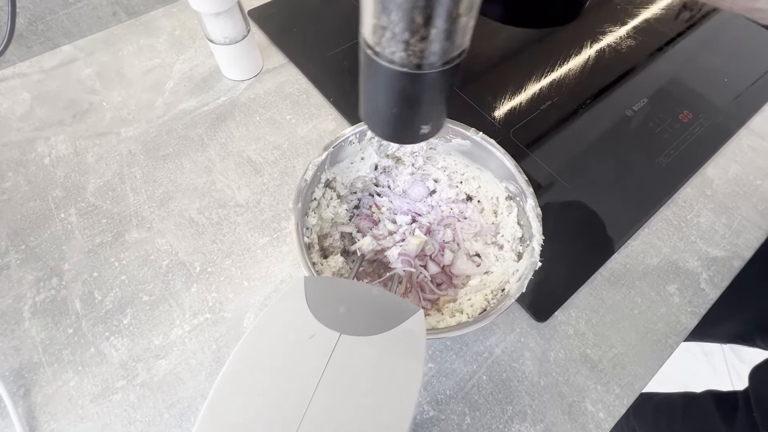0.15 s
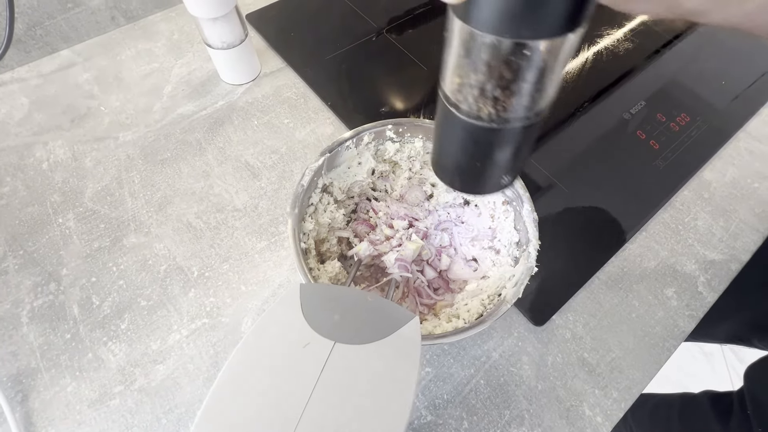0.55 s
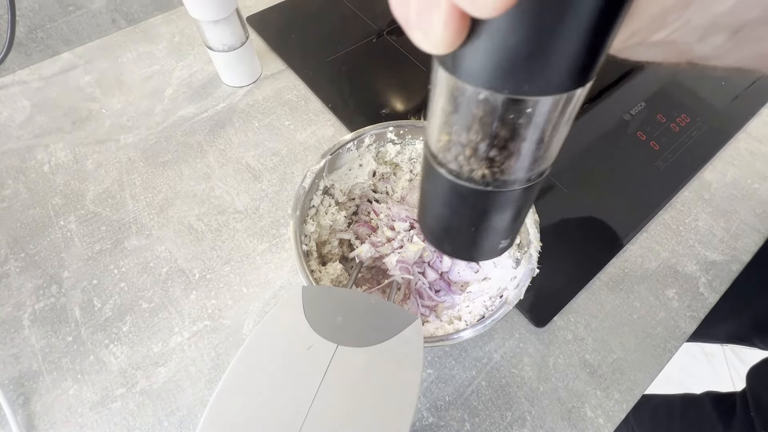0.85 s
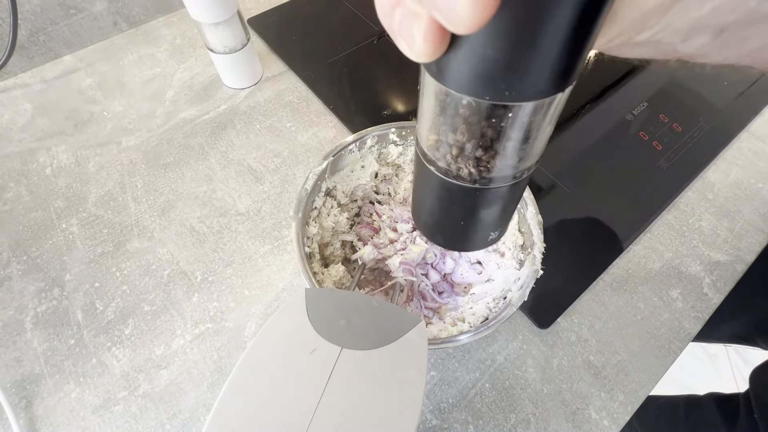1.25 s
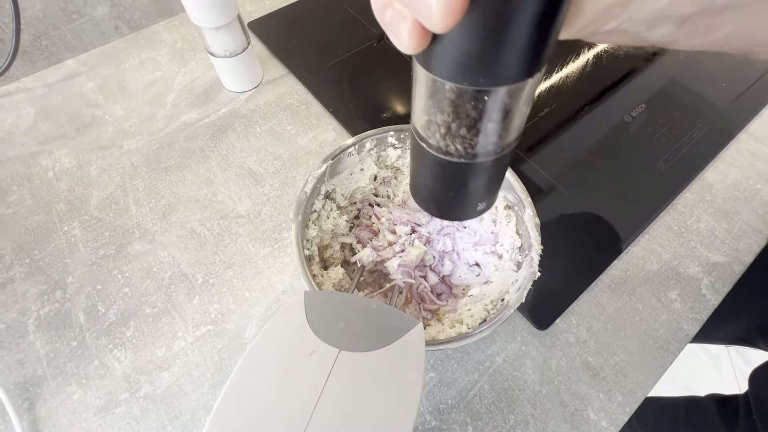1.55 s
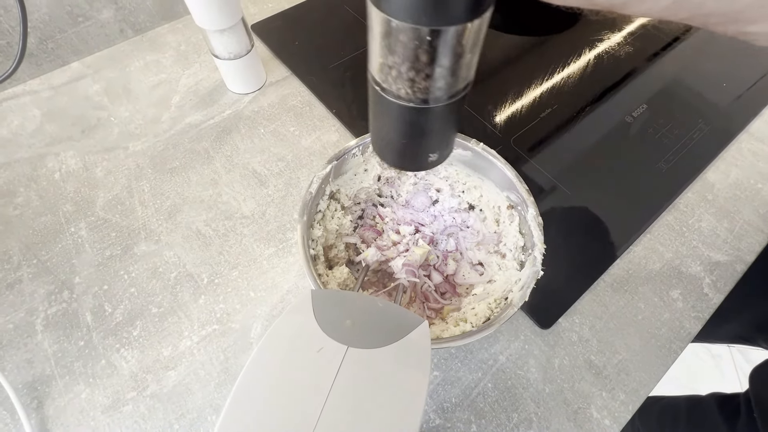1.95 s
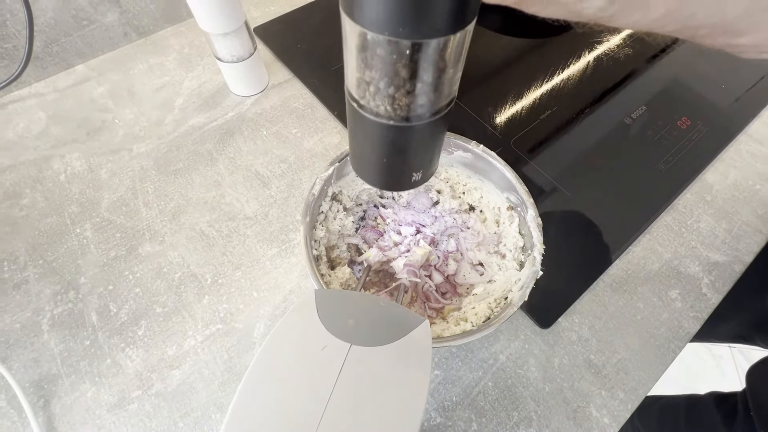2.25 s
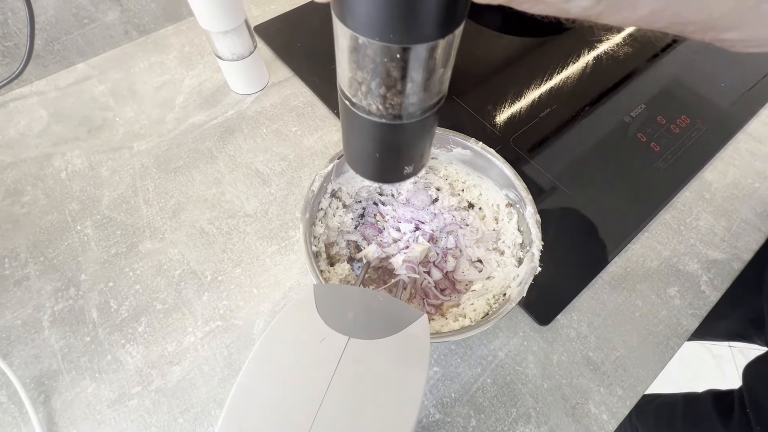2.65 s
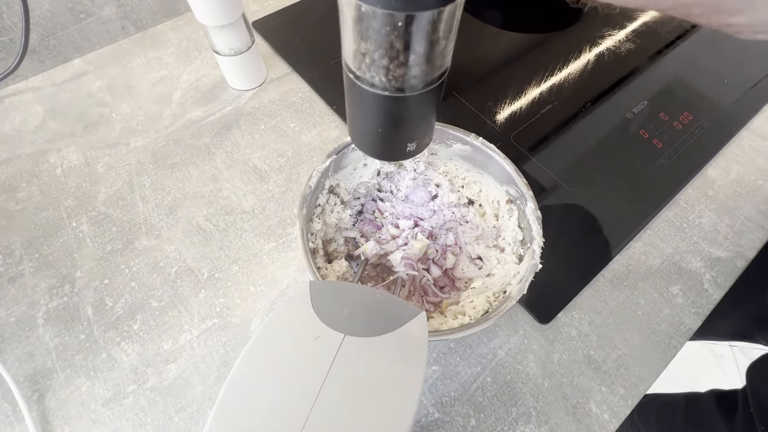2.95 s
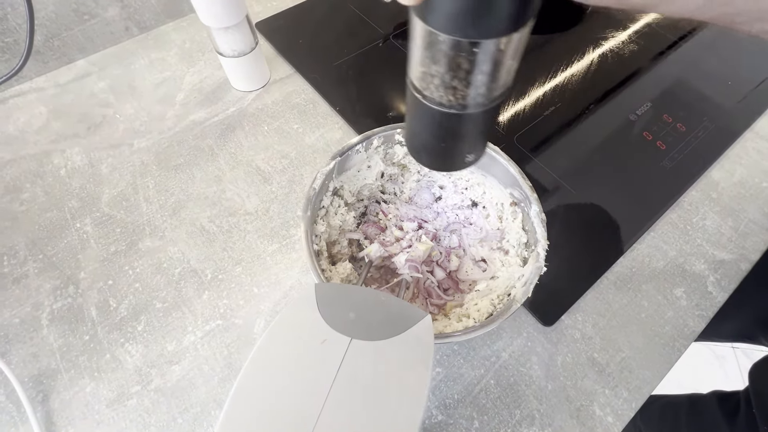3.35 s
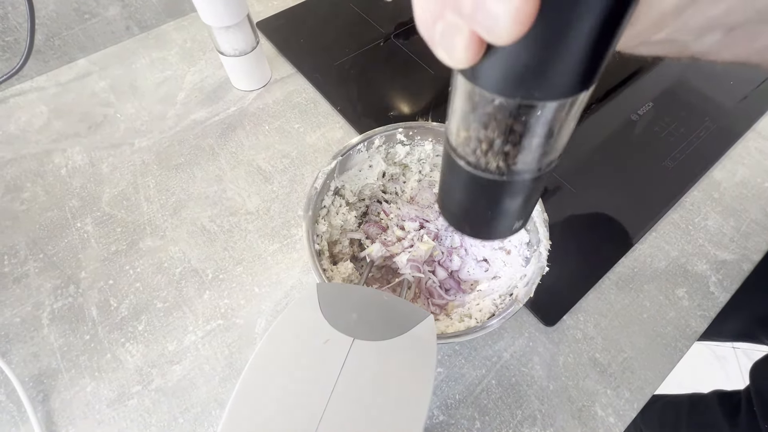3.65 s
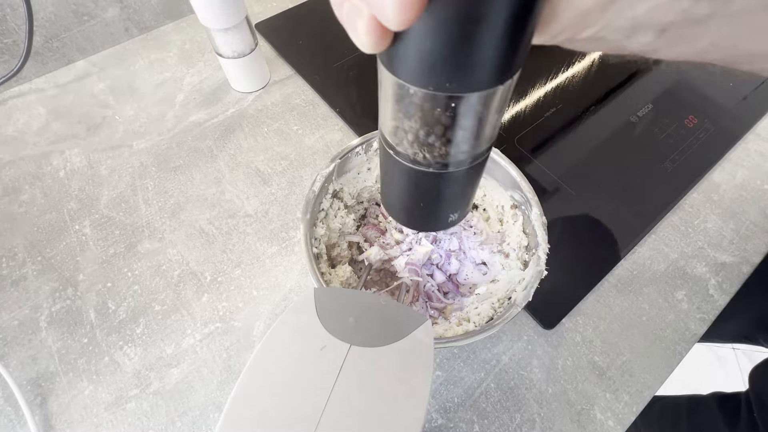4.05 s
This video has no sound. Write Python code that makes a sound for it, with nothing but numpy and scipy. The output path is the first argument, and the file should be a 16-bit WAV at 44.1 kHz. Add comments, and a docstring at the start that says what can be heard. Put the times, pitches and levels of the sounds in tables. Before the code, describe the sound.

A hand-held electric pepper mill grinds continuously close by, its wavering motor whine sagging under load beneath a dry gritty hiss and small cracks.

```python
"""A gritty hiss over a whirring, sagging motor: a hand-held electric pepper mill grinds close by in a kitchen.
The motor is a set of tones locked to one drawn shaft speed, which falls where peppercorns load the burr.
Crushed pepper is noise and random splinters ringing in the plastic shell; one ring glides as the hand moves.
A few corns crack in short noise puffs, dull slips knock in the hopper, and low room noise lies underneath.
Two microphone ports hear the mill with a slowly drifting random colour."""
import sys
import numpy as np
from scipy import signal
from scipy.fft import rfft, irfft, next_fast_len
from scipy.io import wavfile
from scipy.ndimage import uniform_filter1d, map_coordinates

SR = 44100
rng = np.random.default_rng(int(sys.argv[2]) if len(sys.argv) > 2 else 0)


def wav_record(signal):
    """Record a signal, one row per channel, as 16-bit PCM in the file named by sys.argv[1]."""
    frames = np.transpose(np.atleast_2d(signal))
    bounded = np.clip(frames, -1, 1)
    # unit amplitude maps onto the largest positive 16-bit level
    quanta = np.round(bounded * 32767).astype(np.int16)
    wavfile.write(sys.argv[1], SR, quanta)


N = 185069

# Upper and lower resonances of the plastic shell: (centre [Hz], width [Hz], relative level [dB])
UPPER_SHELL = [(5430, 130, -7.5), (5874, 150, 4), (6180, 320, -1.5), (6530, 67, 0)]
LOWER_SHELL = [(3842, 280, -9), (4176, 440, -5.5), (4820, 530, -3), (5490, 420, -3)]
# Broad colour of the crushing noise through the body: (frequency [Hz], relative level [dB])
BODY_COLOUR = [(120, -35), (200, -51), (232, -35), (325, -24), (489, -13), (541, -18.5), (605, -10.5),
               (900, -4), (994, -10.5), (1340, -1.5), (1800, 1), (2590, -6.5), (3360, -2.5), (3900, -7),
               (5070, -69), (8580, -120)]
# Treble colour of the crushing noise: (frequency [Hz], relative level [dB])
FIZZ_COLOUR = [(4060, -66), (6900, 3.5), (7020, -2.5), (7690, -5.5), (8940, 0), (11100, -4.5), (12000, -13),
               (13000, -6.5), (14500, -16), (15600, -25)]


def amp(db):
    """Gain of a level in dB."""
    return 10 ** (np.asarray(db) / 20)


def unit(x):
    """x at rms 1, over all its rows together."""
    return x / np.sqrt(np.mean(x ** 2) + 1e-20)


def along(points, hz):
    """Read (Hz, value) points at hz, along a log frequency axis."""
    f, values = np.transpose(points)
    return np.interp(np.log(hz + 1), np.log(f + 1), values)


def curves(rows):
    """One value per sample for each column after the time."""
    s, *columns = np.transpose(rows)
    return [np.interp(np.arange(N) / SR, s, column) for column in columns]


def wobble(rate):
    """A smooth random curve with rate knots a second."""
    knots = rng.standard_normal(int(N * rate / SR) + 4)
    return map_coordinates(knots, [np.arange(N) * rate / SR])


def filtered(x, response):
    """x shaped by a complex response of frequency."""
    m = next_fast_len(N + SR // 2)
    return irfft(rfft(x, m) * response(np.fft.rfftfreq(m, 1 / SR)), m)[..., :N]


def colour(points):
    """A response that follows (Hz, dB) points."""
    return lambda hz: amp(along(points, hz))


def modes(table):
    """The response of a set of resonances, added with alternating sign."""
    def response(hz):
        total = 0
        for k, (centre, width, db) in enumerate(table):
            ring = 1j * hz * width / (centre * centre - hz * hz + 1j * hz * width)
            total = total + (-1) ** k * amp(db) * ring
        return total
    return response


def field(shape, rows, frames):
    """Random values of rms 1, smooth over rows of frequency and frames of time."""
    raw = rng.standard_normal(shape)
    return unit(uniform_filter1d(uniform_filter1d(raw, rows, -2), frames, -1))


def patchy(depth_db):
    """Two noises sharing patches of random gain in time and frequency."""
    z = signal.stft(rng.standard_normal((2, N)), nperseg=512)[2]
    gain = amp(depth_db * field(z.shape[1:], rows=3, frames=9))
    return signal.istft(z * gain, nperseg=512)[1][:, :N]


def grit(rate, spread_db):
    """Splinters snap off at random moments, rate a second on average, some larger than the rest."""
    draw = rng.random((N, 3))
    size = amp(spread_db * draw[:, 1] ** 2) * np.sign(draw[:, 2] - .5)
    return unit((draw[:, 0] < rate / SR) * size)


def shaft():
    """Shaft speed in Hz and turns so far; the rotor's inertia rounds off the slowing under load."""
    # Motor slowing under load: (time [s], shaft speed [Hz])
    drawn_speed = [(0, 146), (.045, 147.2), (.11, 151.7), (.22, 151.8), (.27, 144.1), (.33, 153.8),
                   (.41, 163.6), (.47, 171.7), (.59, 165.5), (.66, 165.7), (.82, 178.4), (1.05, 173.5),
                   (1.21, 175.4), (1.285, 167.5), (1.34, 171.2), (1.47, 178.4), (1.56, 164.5),
                   (1.62, 160.9), (1.74, 163.3), (1.84, 169.5), (1.9, 169), (1.96, 167.5), (2.06, 157.3),
                   (2.125, 140.6), (2.18, 138), (2.22, 147), (2.28, 165.4), (2.34, 175.9), (2.43, 170.4),
                   (2.54, 176), (2.62, 165.8), (2.675, 156.7), (2.72, 162.8), (2.77, 172.3), (2.84, 180.8),
                   (3.2, 184), (3.31, 178.7), (3.36, 170.3), (3.435, 157.3), (3.47, 162.4), (3.55, 172.8),
                   (3.76, 181), (3.89, 185.5), (4.06, 178.7), (4.19, 176.9)]
    inertia_s = .02
    speed = uniform_filter1d(curves(drawn_speed)[0], int(inertia_s * SR))
    return speed, np.cumsum(speed) / SR


def motor(speed, turns):
    """Tones locked to the shaft: motor hum, meshing gears and the weaker multiples of an uneven rotation."""
    # Low motor tones, stronger as it runs freely: (time [s], shaft hum level [dB], commutator level [dB])
    hum_levels = [(0.03, -63, -61.5), (0.28, -85, -63), (0.43, -65.5, -56), (0.72, -60.5, -50.5),
                  (0.83, -55, -48), (1.0, -55.5, -49.5), (1.51, -56, -49), (1.56, -60, -56),
                  (1.7, -62, -53.5), (1.79, -59, -52), (2.06, -63, -59), (2.1, -73, -65), (2.19, -70, -67),
                  (2.27, -58, -58), (2.33, -56, -48.5), (2.41, -59, -56), (2.48, -57, -47.5),
                  (2.67, -61, -59), (2.79, -59, -49), (2.83, -56, -50), (3.25, -57, -50),
                  (3.39, -61, -55.5), (3.77, -54.5, -46), (3.94, -54, -51), (4.01, -52, -49),
                  (4.12, -56, -50.5)]
    # Singing of the second gear stage: (time [s], level [dB])
    stage_level = [(0, -64), (.38, -56), (.46, -46), (.54, -47), (.6, -54), (.68, -50), (.78, -60),
                   (1, -50), (1.1, -48), (1.25, -54), (1.48, -51), (1.57, -58), (1.63, -47), (1.78, -53),
                   (1.86, -46), (1.92, -50), (1.96, -44), (2.05, -53), (2.1, -64), (2.33, -56), (2.38, -44),
                   (2.44, -39), (2.47, -52), (2.55, -43), (2.63, -50), (2.68, -64), (3.3, -58), (3.95, -58),
                   (4.04, -49), (4.19, -53)]
    # Whine of the loaded pinion: (time [s], level [dB])
    whine_level = [(0, -34), (.05, -33), (.11, -35), (.21, -33), (.27, -36), (.33, -34), (.41, -39),
                   (.46, -52), (.52, -47), (.58, -38), (.66, -50), (1.2, -50), (1.26, -45), (1.31, -52),
                   (1.52, -52), (1.545, -38), (1.59, -36), (1.63, -33.5), (1.74, -38), (1.8, -43),
                   (1.85, -49), (1.885, -38), (1.95, -42), (2, -34), (2.065, -29), (2.09, -38),
                   (2.12, -35.5), (2.17, -38), (2.21, -34.5), (2.24, -36), (2.27, -52), (2.52, -50),
                   (2.58, -42), (2.63, -35), (2.68, -35), (2.72, -39), (2.76, -54), (3.345, -52),
                   (3.37, -39), (3.42, -34), (3.44, -36), (3.465, -50), (3.55, -54), (4.19, -52)]
    # Tone one turn under the tooth rate: (shaft speed [Hz], level [dB])
    sideband_law = [(145, -66), (162, -60), (169, -53), (176, -51), (182, -60)]
    # Teeth clashing under heavy load: (release time [s], build-up [s], peak level [dB])
    clashes = [(.3, .3, -52), (1.67, .06, -52), (2.12, .05, -36), (2.165, .07, -37), (2.67, .06, -41),
               (3.41, .05, -42)]
    # Overtones of a clash: (multiple of the tooth rate, level over the clash [dB])
    mesh = [(2, -5), (3, -1), (4, 4), (5, -3)]
    # Clash colour through the shell: (frequency [Hz], gain [dB])
    clash_colour = [(2500, 0), (2900, 3.5), (3800, 2.5), (4200, -6), (5100, 2), (5700, 2), (6200, -6),
                    (6650, 2), (7100, -14)]
    # Tones of the uneven rotation: (multiple of the shaft speed, level ahead of the housing [dB])
    runout = [(2, -42), (4, -52), (5, -53.5), (6, -52), (10, -48), (11, -48), (12, -47.5)]
    # Housing resonances around the motor: (centre [Hz], width [Hz], level [dB])
    housing = [(664, 103, -7), (912, 41, 3), (1250, 100, -9), (1900, 250, -4)]
    second_stage, teeth = 6.36, 9  # multiples of the shaft speed
    clash_fall_db, release_s = 6, .012  # fall over one build-up before the peak or one release after it

    def tone(multiple, db, flutter_db, blur):
        phase = 2 * np.pi * (multiple * turns + rng.random()) + blur * multiple * wobble(40)
        return np.sqrt(2) * amp(db + flutter_db * wobble(14)) * np.sin(phase)

    shaft_db, commutator_db = curves(hum_levels)
    hum = tone(1, shaft_db, .9, blur=.05) + tone(3, commutator_db, 1.3, blur=.03)

    gears = tone(second_stage, curves(stage_level)[0], 1.5, blur=.08)
    gears += tone(teeth, curves(whine_level)[0] + 1.5 * wobble(60), .7, blur=.03)
    # an off-centre pinion beats once a turn
    gears += tone(teeth - 1, along(sideband_law, speed), 2.5, blur=.04)

    t = np.arange(N) / SR
    swells = []
    for s, rise, db in clashes:
        distance = np.where(t < s, (t - s) / rise, (t - s) / release_s)
        swells.append(db - clash_fall_db * distance ** 2)
    clash_db = np.max(swells, axis=0)
    for k, db in mesh:
        shell_db = along(clash_colour, k * teeth * speed)
        gears += tone(k * teeth, clash_db + db + shell_db + 2 * wobble(70), .7, blur=.014)

    uneven = sum(tone(k, db, 3.2, blur=.02) for k, db in runout)
    # a multiple stands out while it crosses a housing resonance
    return hum + gears + filtered(uneven, modes(housing))


def grinding(speed, turns):
    """Crushing noise excites the shell; row 0 is the direct sound, row 1 an unrelated scattered part."""
    # How hard the burr crushes: (time [s], level [dB]); layers follow the swing about its mean
    crush = [(0, -23), (.08, -29.5), (.23, -25), (.44, -34), (.56, -27.5), (.68, -29.5), (.8, -34.5),
             (.89, -27.5), (1.15, -29), (1.25, -27), (1.39, -31), (1.56, -27), (1.7, -28), (1.79, -30.5),
             (1.97, -28), (2.06, -26), (2.18, -25.5), (2.27, -31.5), (2.4, -29), (2.48, -29), (2.65, -25),
             (2.77, -33.5), (3.03, -31), (3.2, -33), (3.31, -27.5), (3.42, -28), (3.49, -35), (3.59, -31),
             (3.73, -34), (3.83, -36.5), (4.01, -27.5), (4.19, -30)]
    # The hand circles the mill over the bowl: (time [s], nearness, 0 far to 1 near)
    nearness = [(0, 0.11), (.44, 0.2), (.68, 0.17), (.82, 0.98), (1.2, 0.65), (1.46, 0.85), (1.66, 0.18),
                (2.19, 0.056), (2.36, 0.58), (2.6, 0.28), (2.76, 0.31), (3.18, 0.34), (3.27, .8),
                (3.6, 0.79), (3.84, 0.98), (4.19, 0.99)]
    # Swelling of the hiss with the shaft: (multiple of the shaft speed, depth)
    throb_depths = [(1, .11), (2, .05), (5, .05)]
    # Ring of the ceramic burr: (centre [Hz], width [Hz], relative level [dB])
    burr_ring = [(11015, 840, 0)]
    # Burr ring at mean crush: (time [s], level [dB])
    burr_level = [(0, -63), (.35, -58), (.6, -45.5), (1.5, -43.5), (1.95, -62), (2.35, -54), (2.65, -53),
                  (3.15, -65), (3.4, -43.5), (3.7, -47.5), (4.19, -51)]
    # High fizz at mean crush, ahead of a lift: (time [s], level [dB])
    fizz_level = [(0.0, -37), (0.24, -38.5), (0.45, -43), (0.54, -43), (0.76, -46.5), (1.07, -41.5),
                  (1.47, -45.5), (1.54, -39), (1.81, -43.5), (2.11, -38.5), (2.3, -47), (2.43, -40),
                  (2.46, -45.5), (2.65, -37), (2.75, -44), (3.23, -44.5), (3.42, -39), (3.43, -43),
                  (3.44, -42), (3.82, -47.5), (3.93, -43.5), (4.19, -44.5)]
    fizz_lift_db = 2.0
    # A broad shell resonance shifting with grip and tilt: (time [s], centre [Hz])
    grip = [(0, 5350), (.4, 5450), (.65, 5750), (.85, 4700), (1.05, 4750), (1.3, 5050), (1.5, 5250),
            (1.9, 5900), (2.2, 5900), (2.7, 5800), (3.05, 5500), (3.25, 5250), (3.4, 5350), (3.55, 4820),
            (3.75, 5000), (4.19, 5050)]
    grip_width_hz, reference_speed_hz = 420, 170
    (crush_db,), (near,), (centre_hz,) = curves(crush), curves(nearness), curves(grip)

    def level(db, crush_share, near_db=0, db_per_hz=0):
        """Layer gain: follows crushing, nearness of the mill and shaft speed, with a slow random drift."""
        swing_db = crush_share * (crush_db - crush_db.mean()) + near_db * near
        speed_db = db_per_hz * (speed - reference_speed_hz)
        return amp(db + swing_db + speed_db + .26 * wobble(7.25))

    throb = 1 + sum(depth * np.cos(2 * np.pi * (k * turns + rng.random())) for k, depth in throb_depths)
    bite = amp(.35 * wobble(22) + 1.05 * wobble(170)) * throb  # the burr meets uneven loads
    splinters = .48 * grit(1100, spread_db=11) * [[1], [0]]  # every layer hears the same direct splinters

    def rub():
        return bite * (patchy(depth_db=.54) + splinters)

    def layer(response, gain):
        return gain * unit(filtered(rub(), response))

    # ring at the mean centre, then shift its frequency along the grip curve
    mean_hz = centre_hz.mean()
    ring = signal.hilbert(filtered(rub(), modes([(mean_hz, grip_width_hz, 0)])))
    shift = np.exp(2j * np.pi * np.cumsum(centre_hz - mean_hz) / SR)
    hiss = level(-37.5, crush_share=1) * unit(np.real(ring * shift))

    hiss += layer(modes(UPPER_SHELL), level(-34.5, crush_share=.76, near_db=-8.5, db_per_hz=.02))
    hiss += layer(modes(LOWER_SHELL), level(-36.5, crush_share=.5, near_db=2, db_per_hz=-.0151))
    hiss += layer(modes(burr_ring), level(curves(burr_level)[0], crush_share=.2))
    hiss += layer(colour(BODY_COLOUR), level(-38.5, crush_share=.36, near_db=2.15, db_per_hz=.03))
    hiss += layer(colour(FIZZ_COLOUR), level(curves(fizz_level)[0] + fizz_lift_db, crush_share=.3))
    return hiss


def kitchen():
    """Low, steady room air, and a dull rumble that the motor spreads into the room, both as filtered noise."""
    # Colour of the room air: (frequency [Hz], relative level [dB])
    air_colour = [(20, -20), (35, -29), (57, 5), (75, -1.5), (110, -9), (140, 7.5), (250, -25), (400, -21),
                  (600, -12), (900, -120)]
    # Low rumble: (time [s], level [dB])
    rumble_level = [(0, -64), (.3, -79), (.6, -68), (.9, -63.5), (1.5, -66.5), (2.1, -66.5), (2.5, -64),
                    (3.2, -65.5), (3.7, -64.5), (4.19, -59.5)]

    def pair():
        """A noise common to both ports plus a weaker one of each port's own."""
        return rng.standard_normal(N) + .5 * rng.standard_normal((2, N))

    rumble = unit(filtered(pair(), lambda hz: modes([(290, 300, 0)])(hz) ** 2))
    air = unit(filtered(pair(), colour(air_colour)))
    return amp(-71.5) * air + amp(curves(rumble_level)[0]) * rumble


def place_hits(hits):
    """Lay (time [s], peak level [dB], sound) hits on silence, each scaled to its peak."""
    out = np.zeros(N + SR)
    for s, db, sound in hits:
        out[round(s * SR):][:len(sound)] += amp(db) * sound / np.abs(sound).max()
    return out[:N]


def cracks():
    """A bursting corn sends a short broad puff of noise through the shell."""
    # Bursting corns: (time [s], peak level [dB], low ring over the rest [dB])
    bursts = [(.066, -22, -8), (.091, -21, -8), (.159, -23, -5), (.547, -22, -3), (.971, -22, -4),
              (1.27, -22, -3), (1.553, -18, -5), (1.625, -22, -5), (1.995, -22, -3), (2.057, -17, -8),
              (2.113, -19, -8), (2.159, -18, -8), (2.186, -18, -8), (2.212, -21, -5), (2.595, -22, -2),
              (3.296, -20, -5), (3.305, -21, -8), (3.336, -21, -2), (3.4275, -11.5, -4), (3.432, -16.5, -8),
              (3.582, -23, -5)]
    # Lower modes of the shell: (centre [Hz], width [Hz], relative level [dB])
    low_ring = [(1900, 200, 2), (2400, 200, -7)]
    t = np.arange(SR // 20) / SR
    hz = np.fft.rfftfreq(len(t), 1 / SR)
    shell = modes(UPPER_SHELL + LOWER_SHELL[2:])(hz)
    shell = shell + amp(along(BODY_COLOUR, hz) - 12) + amp(along(FIZZ_COLOUR, hz) - 11)
    shape = amp(-60 * t / .006) * (1 - np.exp(-t / .0003))  # falls 60 dB in 6 ms
    hits = []
    for s, db, low_db in bursts:
        puff = rfft(shape * rng.standard_normal(len(t)))
        response = shell + amp(low_db) * modes(low_ring)(hz)
        hits.append((s, db, irfft(puff * response, len(t))))
    return place_hits(hits)


def knocks():
    """A slip inside the mill is a soft contact that rings only the middle of the hopper's range."""
    # Dull slips: (time [s], peak level [dB])
    slips = [(1.277, -26.5), (1.392, -30.5), (1.991, -34), (3.395, -33), (3.447, -36)]
    # Hopper resonances: (centre [Hz], width [Hz], relative level [dB])
    hollow = [(580, 270, -1.5), (850, 300, 0), (1300, 550, -1.5)]
    length = SR // 20
    hz = np.fft.rfftfreq(length, 1 / SR)
    knock = irfft(modes(hollow)(hz) ** 2, length)
    return place_hits([(s, db, knock) for s, db in slips])


def ports(direct, scattered):
    """Two microphone ports: level and phase differ with frequency, the scattered part arrives in opposition."""
    # Likeness of the two ports: (frequency [Hz], left-right correlation)
    alike = [(60, 0.54), (150, 0.67), (380, 0.4), (950, 0.75), (2400, .87), (6000, 0.74), (9000, .82),
             (15000, .58)]
    # Level difference: (frequency [Hz], left over right [dB])
    left_over_right = [(200, -.3), (380, -1), (520, .3), (700, 3.5), (1290, 6), (2380, 1.5), (4400, 1),
                       (8100, -.3), (15000, .5)]
    # Phase difference: (frequency [Hz], left lead [rad])
    left_lead = [(200, .05), (550, -.1), (950, 1), (1250, -.1), (3000, .25), (4650, .3), (5860, -.7),
                 (6630, .7), (7320, 6), (8100, 5.3), (9500, 5.5), (15000, 5)]

    def place(hz):
        """Half of each difference goes to the left, the opposite half to the right."""
        half = amp(along(left_over_right, hz) / 2) * np.exp(.5j * along(left_lead, hz))
        return np.array([half, 1 / half])

    def scatter(hz):
        angle = np.arccos(np.clip(along(alike, hz), -1, 1)) / 2
        return place(hz) * np.tan(angle)

    return filtered(direct, place) + filtered(scattered, scatter) * [[1], [-1]]


def drifting_colour(pair, shared_db, port_db, port_rad):
    """Slow random gain and phase changes, narrow in frequency, colour the sound, a little apart at each port."""
    hz, _, z = signal.stft(pair, SR, nperseg=1024)
    reach = np.clip(hz / 1500, 0, 1)[:, None]  # the changes fade out towards low frequencies
    gain_db = shared_db * field(z.shape[1:], rows=3, frames=24)
    gain_db = gain_db + port_db * field(z.shape, rows=5, frames=30)
    phase = port_rad * field(z.shape, rows=6, frames=40)
    coloured = z * amp(reach * gain_db) * np.exp(1j * reach * phase)
    return signal.istft(coloured, nperseg=1024)[1][:, :N]


def scene():
    """The mill at the two ports, over the room's floor."""
    speed, turns = shaft()
    hiss, scattered = grinding(speed, turns)
    grind = drifting_colour(ports(hiss, scattered), shared_db=2.1, port_db=.7, port_rad=.6)
    works = motor(speed, turns) + cracks() + knocks()
    whir = drifting_colour(ports(works, np.zeros(N)), shared_db=.5, port_db=.8, port_rad=.2)
    return grind + whir + kitchen()


def record(dry):
    """The phone keeps nothing above its band limit."""
    top_hz = 15750
    return filtered(dry, lambda hz: hz < top_hz)


dry = scene()
out = record(dry)
wav_record(out)
```